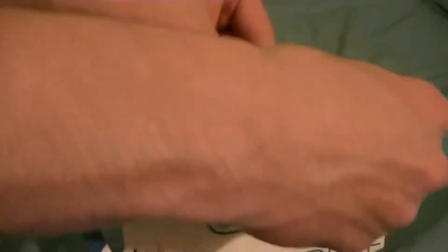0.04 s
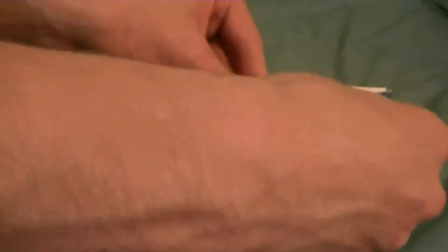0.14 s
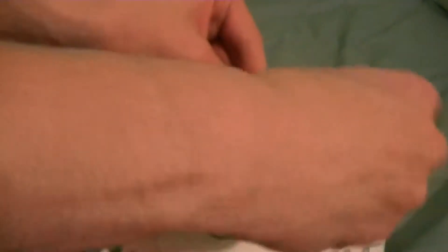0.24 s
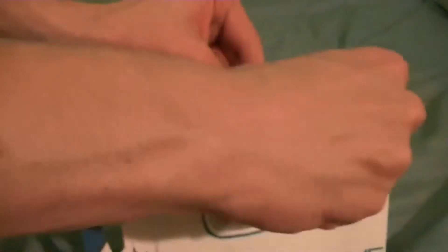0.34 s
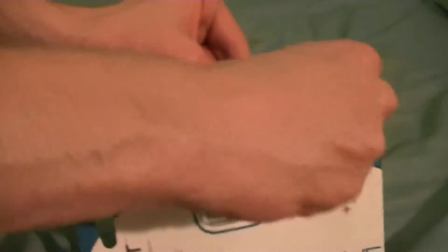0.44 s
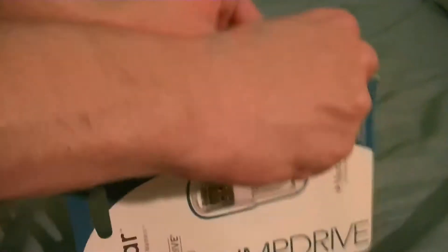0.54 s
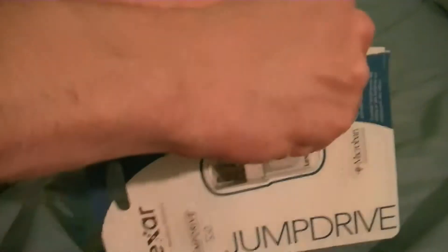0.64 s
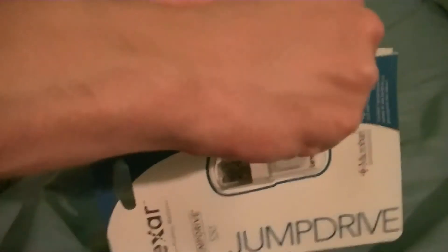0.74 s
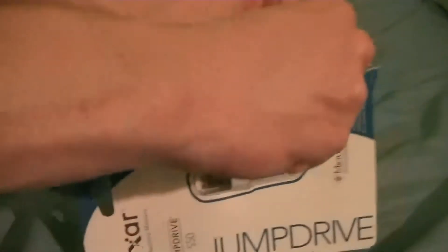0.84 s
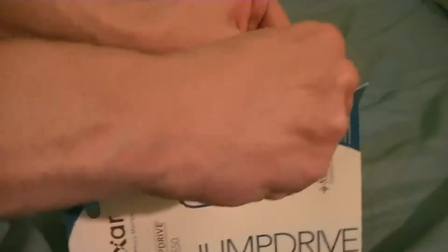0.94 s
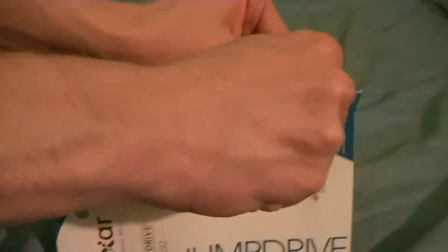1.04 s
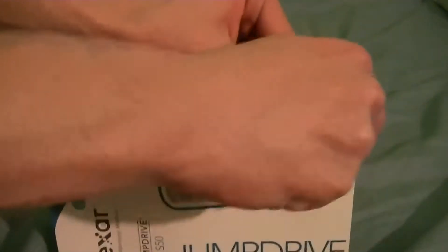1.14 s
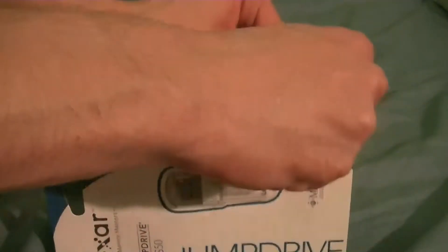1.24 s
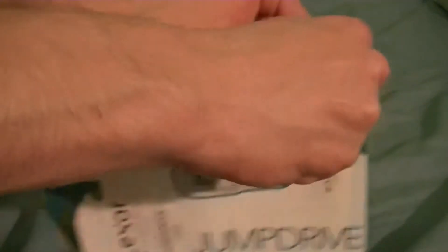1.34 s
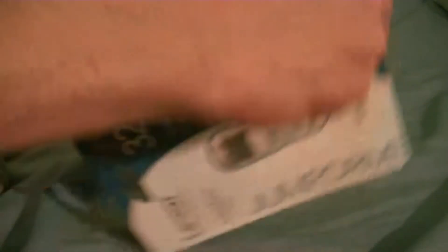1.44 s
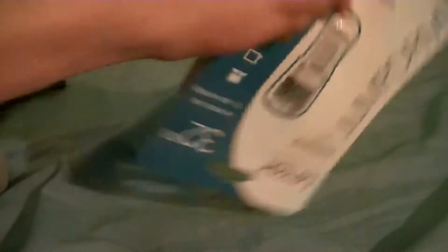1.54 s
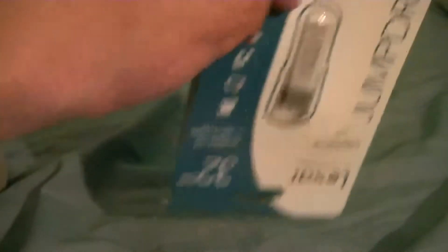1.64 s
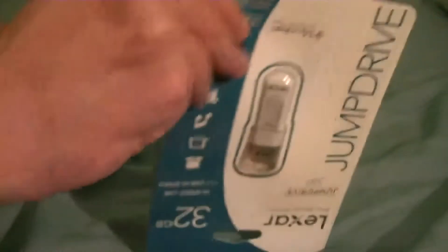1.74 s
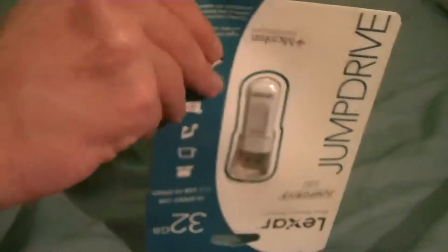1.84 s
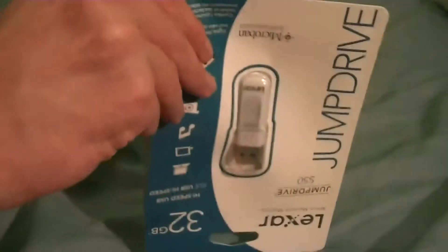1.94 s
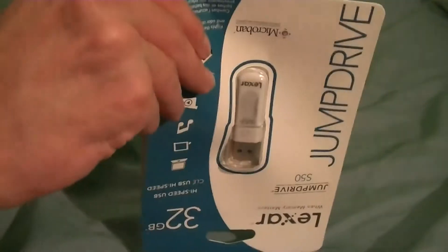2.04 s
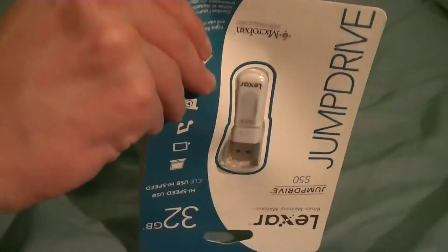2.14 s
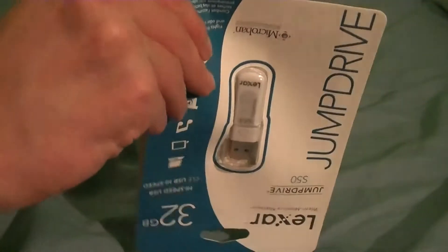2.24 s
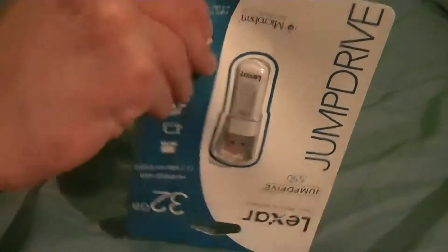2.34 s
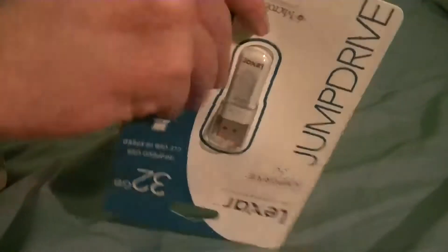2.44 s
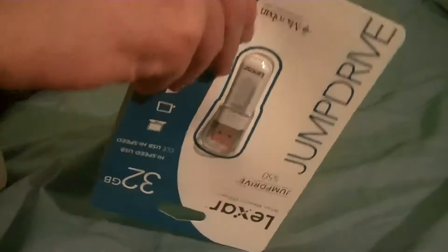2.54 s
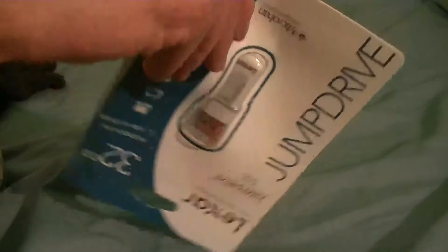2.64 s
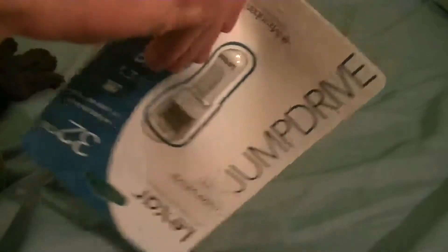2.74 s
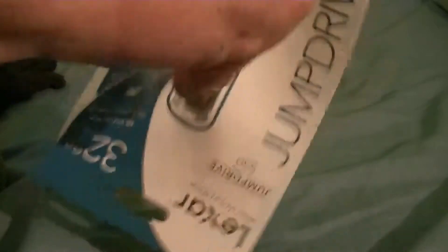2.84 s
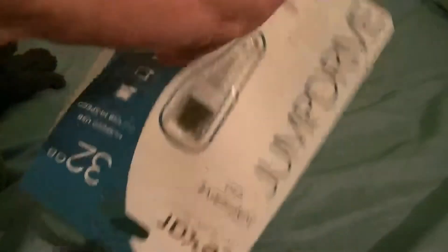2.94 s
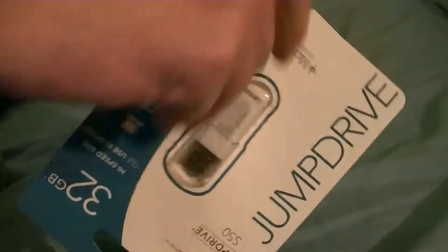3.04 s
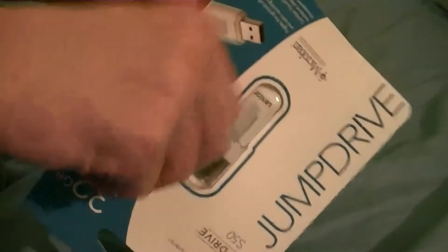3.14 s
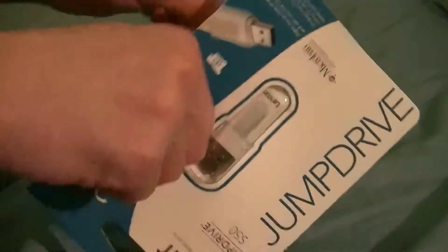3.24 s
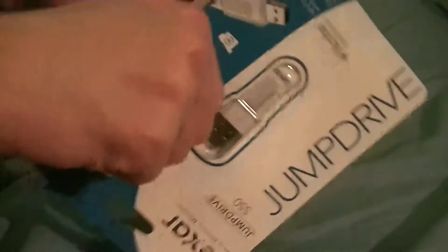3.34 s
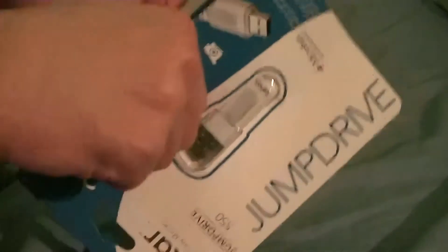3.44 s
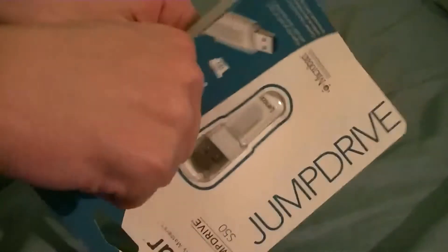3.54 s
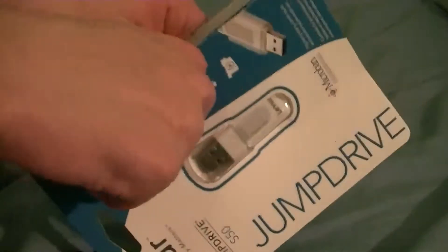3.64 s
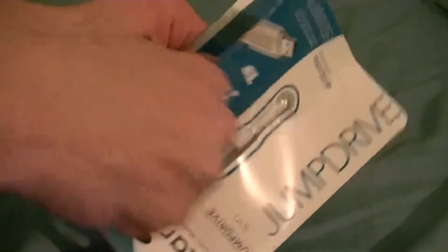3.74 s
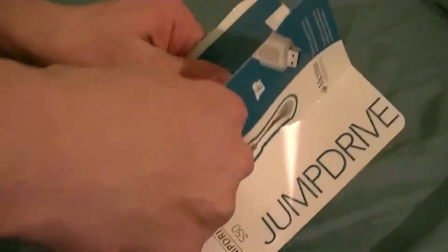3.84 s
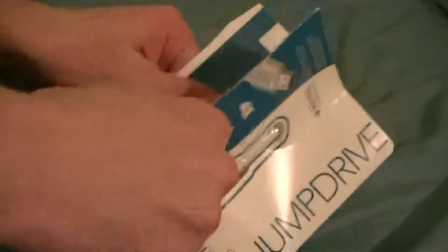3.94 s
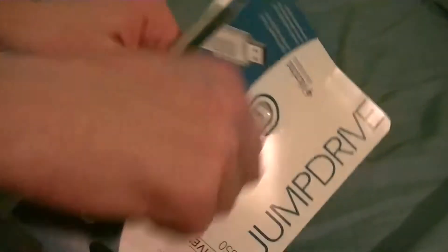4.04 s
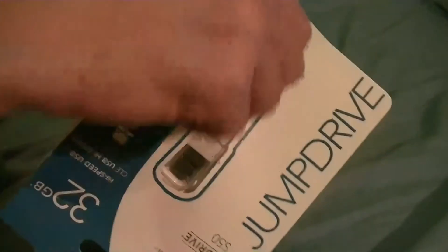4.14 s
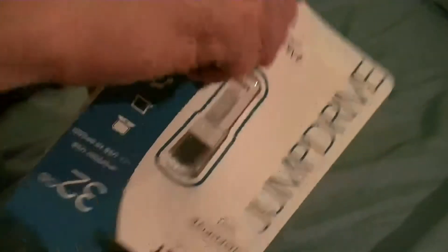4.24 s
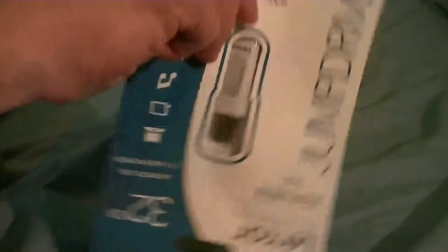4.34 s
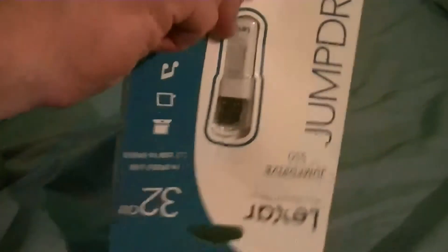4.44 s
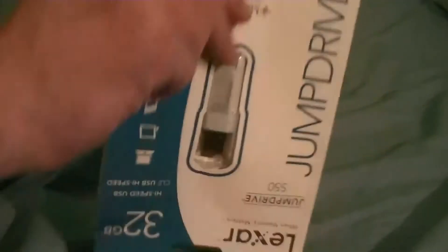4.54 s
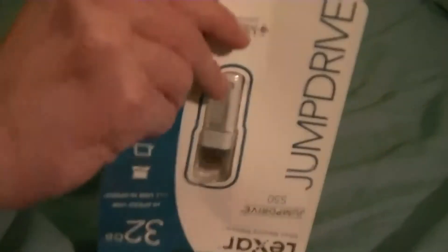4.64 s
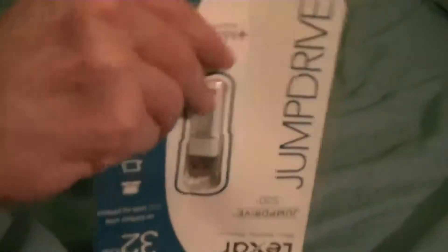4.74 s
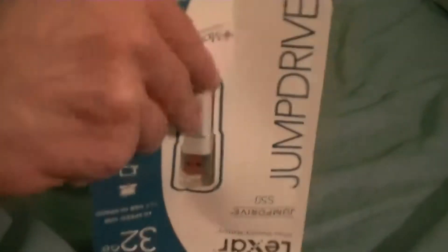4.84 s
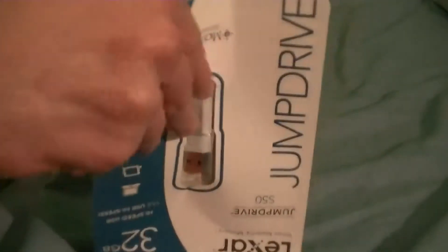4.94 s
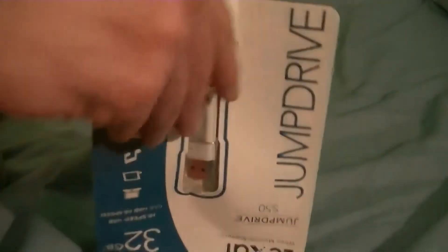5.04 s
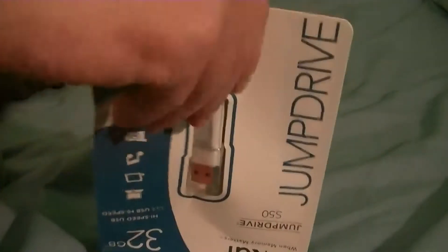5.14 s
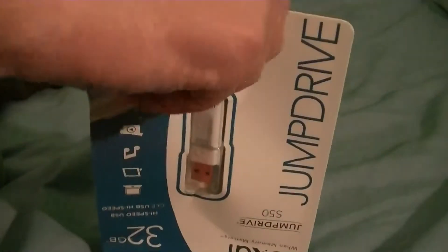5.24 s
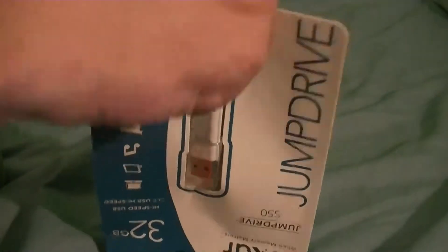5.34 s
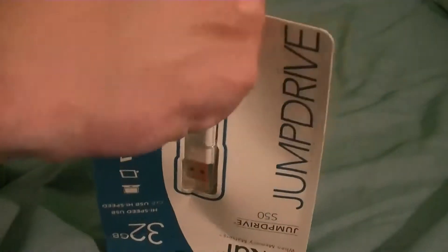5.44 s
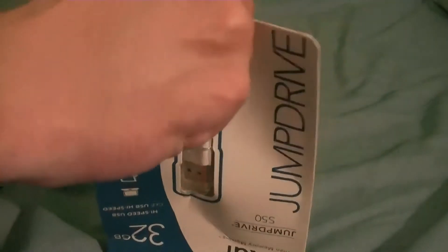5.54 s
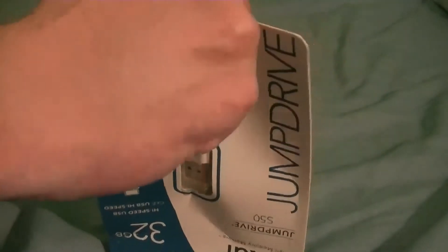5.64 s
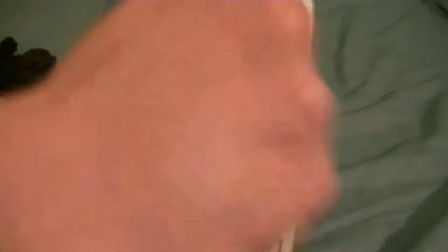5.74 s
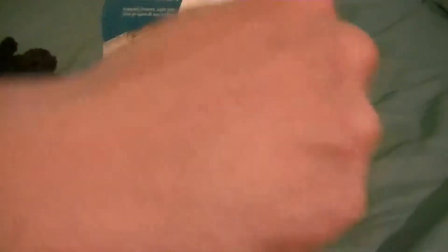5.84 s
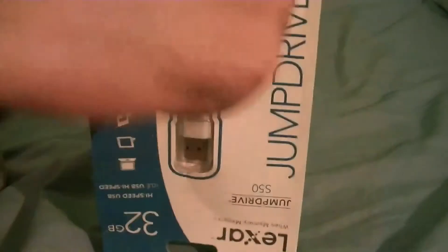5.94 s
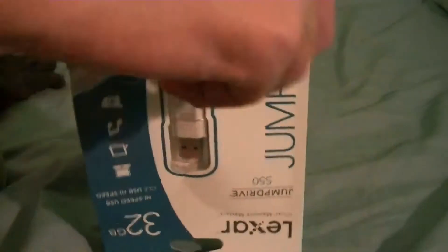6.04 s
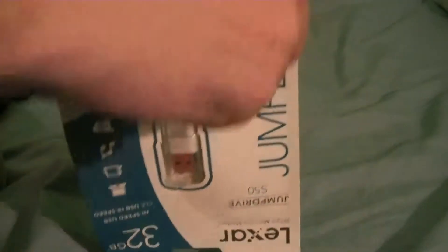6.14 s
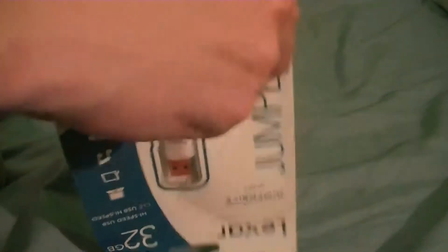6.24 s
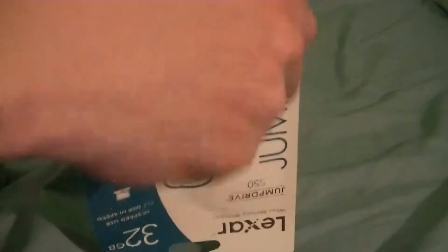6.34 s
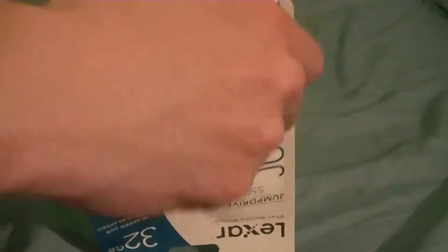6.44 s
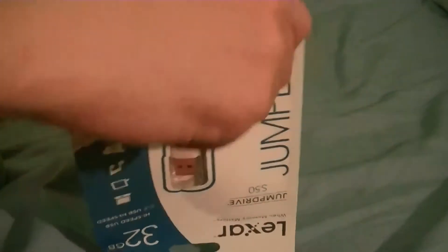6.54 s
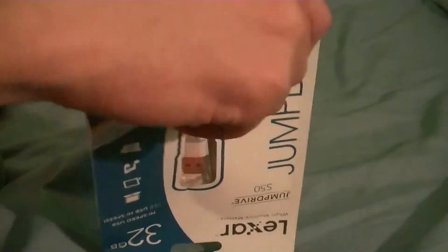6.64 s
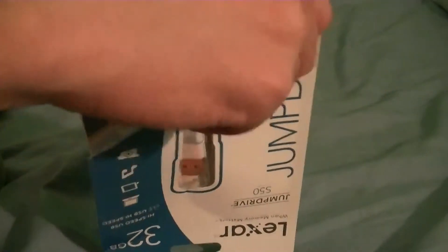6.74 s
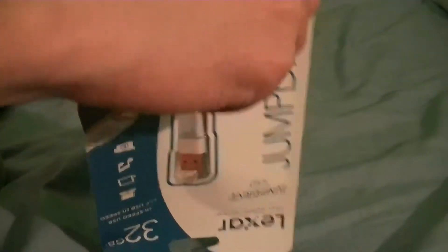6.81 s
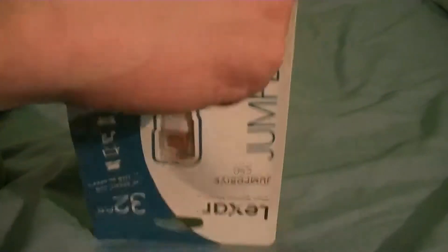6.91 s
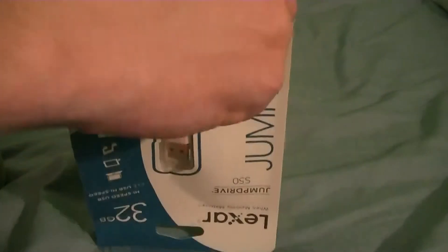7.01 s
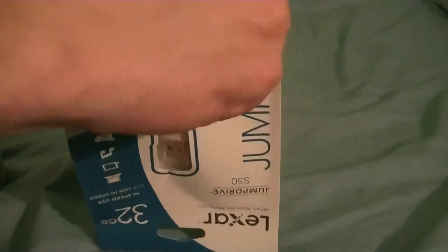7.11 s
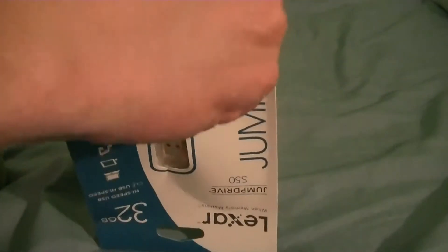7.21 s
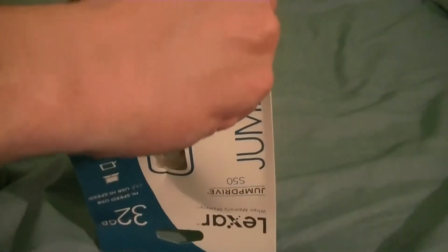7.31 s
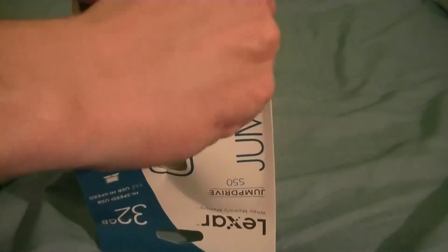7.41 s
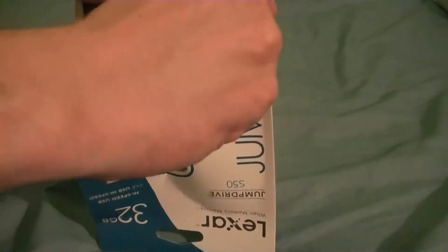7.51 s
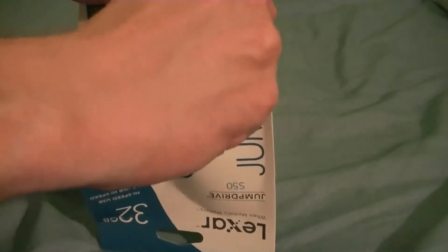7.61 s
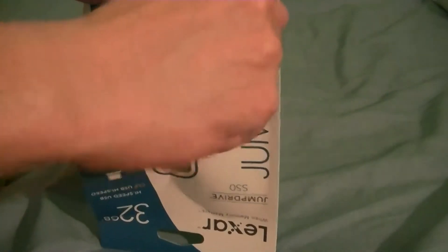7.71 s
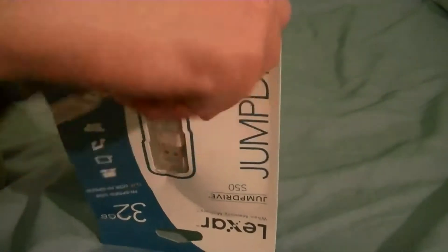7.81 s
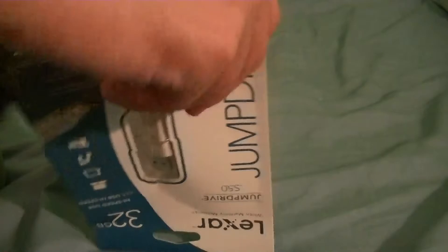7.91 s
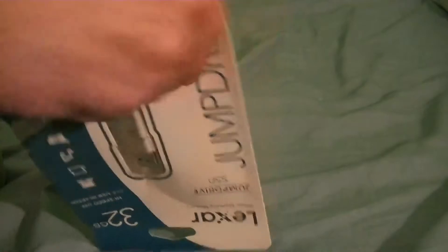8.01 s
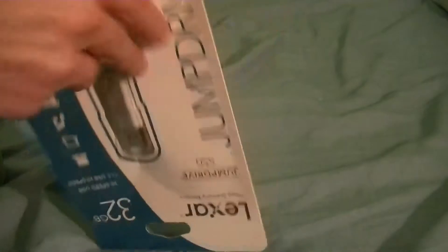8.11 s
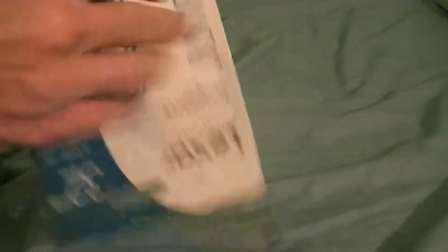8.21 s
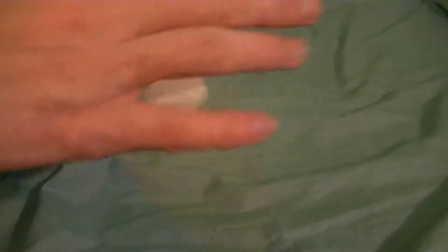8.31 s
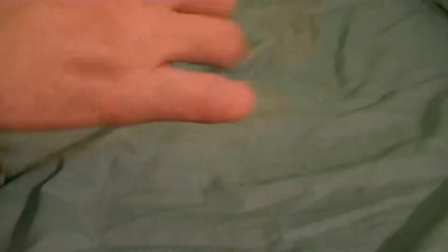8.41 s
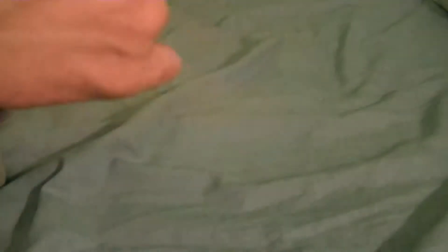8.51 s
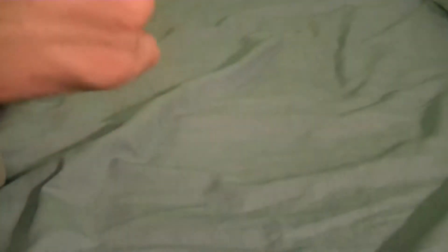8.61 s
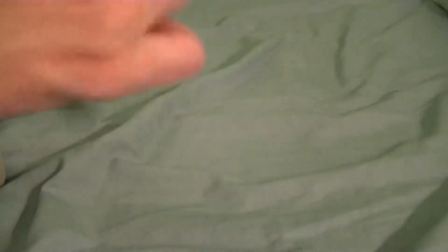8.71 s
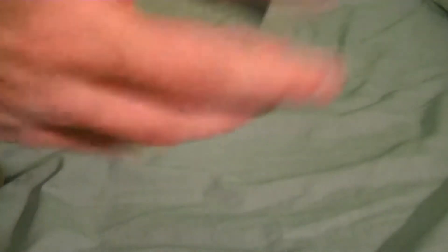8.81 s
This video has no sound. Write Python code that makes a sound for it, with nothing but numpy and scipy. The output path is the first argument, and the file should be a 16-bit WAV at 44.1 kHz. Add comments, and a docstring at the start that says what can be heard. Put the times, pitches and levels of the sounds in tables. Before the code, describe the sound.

Close, dry handling of a card-and-plastic blister pack over a bed in a small furnished room, heard through a small camera microphone with faint steady hiss. It opens with a short card-on-skin rub, then soft strokes, fine crinkling and isolated cracks until 1.5 s, with tiny skin squeaks and light scraping. Soft knocks near 1.5 s lead to quieter, dense ticking around 1.9-2.3 s. At 2.75 s the seam rips in a sharp, loud burst. Rubbing resumes; hard plastic cracks cluster at 3.7 s and 4.4 s, with a quick high squeak sliding down at 4.5 s. After lighter clicks, the loudest ripping fracture overloads at 5.6-5.75 s. Crisp pops and rubs follow, strongest near 6.9 s, thinning past 7 s. Around 8.1-8.25 s the pack is lifted with squeak, snap and brief ringing, then faint rustling and a last small crack at 8.6 s.

```python
"""First a short dry rub of card on skin, then hands prying open a card-and-plastic blister pack.
Place: over a bed in a small furnished room; distance: close; microphone: that of a small camera.
Rubs and rips are tiny fibre clicks and noise through the pack's resonances; the shell's cracks are ringing
pulses, skin squeaks in stick-slip partials, and an edge scrapes as slips driving a sliding resonance.
Twice the seam snaps in runs of fractures that overload the microphone; the room answers briefly."""
import sys
import numpy as np
from scipy import signal
from scipy.fft import rfft, irfft, next_fast_len
from scipy.io import wavfile
from scipy.ndimage import map_coordinates

SR = 44100
rng = np.random.default_rng(int(sys.argv[2]) if len(sys.argv) > 2 else 0)


def file_out(sig):
    """Save sig as 16-bit WAV at sys.argv[1]."""
    # one column per channel
    cols = np.atleast_2d(sig).T
    # limit, then scale
    lim = np.clip(cols, -1, 1)
    pcm = np.round(lim * 32767).astype(np.int16)
    wavfile.write(sys.argv[1], SR, pcm)


N = 391166
T = np.arange(N) / SR  # time in seconds
TAPS = 2048  # length of a pulse in samples
HZ = np.fft.rfftfreq(TAPS, 1 / SR)

# Colour of card sliding on card and skin. Each row: frequency in Hz, relative level in dB.
RUB_COLOUR = [(30, -32.5), (60, -40), (120, -35.5), (200, -11.5), (400, -1.5), (700, 1), (1600, 2.5),
              (2500, -0.5), (4900, -1), (6300, -4), (7600, -8), (9600, -9.5), (12000, -17), (14200, -24.5),
              (16000, -29.5)]
# Broad resonances and dips of card and shell. Each row: centre in Hz, width in Hz, boost or cut in dB.
PACK_RESONANCES = [(716, 107, 0), (1468, 123, -1.5), (1877, 45, -1.5), (2380, 640, 1.5), (3320, 380, 1),
                   (4520, 300, 1.5), (6300, 1680, -8.5), (8300, 900, 1), (10400, 980, 0)]
# Fingers and card slide over each other. Each row: fastest moment in seconds, rise in seconds,
# fall in seconds, level in dB, extra card body in dB, extra hiss in dB.
STROKES = [(0.063, 0.015, 0.011, -46.5, -7, -3), (0.212, 0.019, 0.035, -53, 1, 4),
           (0.398, .1, 0.058, -55, 0.5, 2.5), (0.501, 0.043, 0.075, -52, 5, 4),
           (0.736, 0.018, 0.014, -52, 2.5, 1), (0.812, 0.011, 0.022, -58.5, 15.5, 0),
           (0.917, 0.12, 0.024, -54.5, -2.5, 4), (1.026, 0.07, 0.034, -54, -6, 4.5),
           (1.095, 0.016, 0.012, -48, 5, 1), (1.324, 0.098, 0.11, -50.5, 3, 4),
           (1.401, .047, 0.061, -48, -2.5, 7.5), (1.745, 0.12, 0.011, -64, 6, 7),
           (2.205, 0.017, 0.044, -61.5, 6, 5), (2.32, 0.021, 0.047, -58, 6, 9),
           (2.435, 0.051, 0.0043, -54.5, 8, 8.5), (2.664, 0.076, 0.024, -48.5, -3.5, 0),
           (2.915, 0.0089, 0.011, -47, -6, 10), (2.985, 0.024, 0.05, -52, 2.5, 7),
           (3.095, 0.07, 0.019, -55.5, -0.5, 7), (3.15, 0.0072, 0.059, -61, -14, 18.5),
           (3.253, .026, 0.043, -46.5, 2.5, -6.5), (3.408, 0.032, 0.028, -54, -4.5, 2.5),
           (3.507, 0.03, 0.046, -58, -28, 12), (3.681, 0.009, 0.026, -42, 5.5, -5),
           (3.944, 0.022, 0.014, -54, -16, 7.5), (4.015, 0.022, 0.049, -50, -1, 6),
           (4.07, 0.066, 0.069, -49, -11, 4.5), (4.259, 0.13, 0.027, -58, 5.5, 5.5),
           (4.345, 0.021, 0.16, -53, -1.5, 3), (4.51, 0.0032, 0.022, -39, -15, -4),
           (4.752, 0.055, 0.031, -53, -15, 13.5), (4.885, 0.0098, 0.097, -66, 7, 13.5),
           (5.056, 0.094, 0.01, -52.5, -12, 5), (5.172, 0.015, 0.02, -59.5, -11, 5.5),
           (6.168, 0.024, 0.0091, -49.5, 0.5, 0), (6.22, .016, 0.05, -44.5, -0.5, 1),
           (6.395, 0.0074, 0.034, -57, -12, 6), (6.624, 0.072, 0.017, -51.5, 2.5, 2.5),
           (6.781, .026, 0.15, -46.5, -2, 2), (6.865, 0.0083, 0.023, -39, 8.5, -13),
           (7.06, 0.032, 0.087, -57.5, -2.5, 2.5), (7.294, 0.0031, 0.029, -57, 5.5, 6),
           (7.505, 0.023, 0.024, -63.5, 0, -1), (7.732, 0.025, 0.029, -58.5, -2, 8),
           (7.992, 0.039, 0.056, -52, -1.5, 7.5), (8.112, 0.029, 0.023, -44.5, -7, 1),
           (8.199, 0.0026, 0.0091, -42.5, 6.5, 0), (8.227, 0.0037, 0.033, -48, 7, -4),
           (8.498, 0.11, 0.02, -56, -5, 0.5), (8.647, 0.012, .048, -53, 1, 0.5)]
# Light rubbing of the hands that hold the pack. Each row: time in seconds, level in dB.
HOLDING = [(0.0, -66), (1.5, -61.5), (1.9, -73.5), (2.3, -61.5), (3.1, -61.5), (3.62, -70), (3.88, -72.5),
           (4.6, -61), (5.2, -64), (5.36, -68.5), (5.5, -69), (5.98, -72.5), (6.75, -63), (7.0, -87),
           (7.26, -76), (7.9, -63.5), (8.33, -92), (8.45, -76), (8.8, -81)]
# The card rips. Each row: start in seconds, rise in seconds, level in dB, fade in dB per second,
# extra card body in dB, extra hiss in dB.
RIPS = [(2.73, 0.073, -36, 148, -2.5, 4.5), (3.678, 0.05, -46.5, 245, 11, 4.5),
        (5.632, 0.057, -31, 148, 4.5, -1.5)]
# The shell buckles. Each row: start in seconds, peak in dB before the common trim in cracking(),
# ring in Hz, tick in dB, thump in dB.
CRACKS = [(0.243, -24, 1740, -8.5, -24), (0.688, -33.5, 2310, -4, -26), (0.815, -32, 1610, 0, 14),
          (1.094, -36.5, 2320, -14, 12), (1.642, -43, 1430, 7, -8), (1.874, -39.5, 1400, -6, -7),
          (1.919, -46.5, 770, 3, 6), (1.962, -30, 835, 2.5, -12), (1.986, -44, 1700, -12, -8),
          (2.033, -38.5, 1470, -1, 5), (2.0815, -36, 3140, 18, 5), (2.0843, -34, 1560, -6, 6),
          (2.116, -44, 640, -21, 3), (2.149, -56, 1700, -13, -6), (2.162, -36, 1480, -15, -40),
          (2.185, -39, 1450, -18, -18), (2.213, -38, 1470, -6, 3), (2.227, -40, 1560, 14, -5),
          (2.247, -39, 1750, -9, -8), (2.294, -39.5, 1250, 2, -2), (3.035, -33, 2350, -5, -15),
          (3.343, -39, 5500, 17, -10), (3.677, -25, 1320, -21, -1), (3.697, -21.5, 1280, -5, -11),
          (3.712, -16.5, 2000, -24, -36), (3.737, -11.5, 2060, 4, 1), (3.893, -39.5, 1540, -24, 3),
          (4.021, -28, 1900, -5, 1), (4.352, -18.5, 1900, -10, -13), (4.384, -21.5, 2160, -5, -14),
          (4.416, -38, 2440, -8, 3), (5.13, -30.5, 2660, 7, 6), (5.223, -45, 2140, -10, -6),
          (5.238, -32.5, 2040, -5, 4), (5.38, -44, 1240, 2.5, 0.5), (5.456, -38.5, 1960, 4, 2),
          (5.477, -41, 1380, 0, -4), (5.572, -31.5, 1620, -5, -24), (5.671, -14.5, 1840, -10, -4),
          (5.673, -11, 1220, -4, -12), (5.71, -7, 1770, -48, 2), (5.713, -15.5, 2150, -10, -6),
          (5.726, -16.5, 1650, -21, -8), (5.741, -20, 1780, -17, 7), (6.061, -34.5, 2930, 7.5, 3),
          (6.139, -24, 3130, -5, -5), (6.483, -33, 3020, -1, 2), (6.576, -29.5, 2280, -4, -27),
          (6.722, -36.5, 1290, -6, 5), (6.775, -28, 1120, 2, -1), (6.865, -17.5, 1170, -6, -5),
          (6.877, -18.5, 1890, -9, -26), (7.13, -29, 1330, -2.5, -2), (7.291, -30.5, 1460, -19, 1),
          (7.864, -27.5, 1920, 2, 4), (7.887, -36, 1070, -9, -10), (7.933, -31, 1800, -8, 10),
          (7.949, -38, 2000, -5, 0), (7.995, -26.5, 1920, -3, -20), (8.198, -25.5, 2460, 5, 13),
          (8.2266, -26, 1640, 9, 11), (8.259, -32, 1960, -13, -4), (8.638, -33, 2130, -9, 11)]
# Colour of a fracture. Each row: frequency in Hz, relative level in dB.
CRACK_COLOUR = [(30, -35.5), (150, -16.5), (400, -4.5), (1000, -1.5), (2000, 1.5), (3300, 2), (5000, -3.5),
                (8000, -3.5), (12000, -14.5), (16000, -45.5)]
# Modes of a buckling facet. Each row: ratio to its ring, level in dB.
FACET_MODES = [(1, 14), (0.59, 11), (1.4, 4.5), (6, 0)]
# The seam gives way in runs of fractures. Each row: start in seconds, peak of the first fracture in dB,
# length in seconds, thump in dB, ring width in Hz (its sign has no effect).
SNAPS = [(2.728, -13.5, 0.0024, 8.5, 3), (2.7509, -12.5, 0.0012, 9.5, -2),
         (2.7703, -16.5, 0.0021, -15, 3.5), (5.6308, -13, 0.0037, 7, 11), (5.7005, -15, .0045, 3.5, -3)]
# Spells of fine crinkling. Each row: start in seconds, end in seconds, middle of the peak levels in dB.
CRINKLES = [(0.095, 1.502, -46.5), (1.798, 2.269, -53), (3.675, 3.798, -42), (5.668, 5.79, -26.5),
            (6.449, 6.953, -41), (8.354, 8.711, -52)]
# Skin sticks and slips on plastic. Each row: start in seconds, length in seconds, start pitch in Hz,
# middle pitch in Hz, end pitch in Hz, level in dB, second partial in dB, third partial in dB,
# pitch jitter as a share.
SQUEAKS = [(0.53, 0.117, 584, 635, 673, -52, -6, 0, 0.0037),
           (0.59, 0.04, 590, 784, 560, -46.5, -3, -7, 0.017),
           (0.792, 0.036, 1080, 1277, 1720, -49.5, -14, -18, 0.1),
           (1.328, 0.054, 591, 776, 590, -51, -8, -11, .02),
           (1.403, 0.023, 930, 768, 480, -48, -12, -16, .04),
           (2.301, 0.046, 420, 469, 337, -55.5, -4, -8, 0.023),
           (2.394, 0.048, 573, 960, 580, -46, -17, -27, 0.033),
           (3.243, 0.026, 1150, 1288, 1180, -37, -10, -32, 0.023),
           (4.217, 0.05, 416, 625, 430, -53, -10, -21, 0.017),
           (4.506, 0.012, 2040, 2020, 1840, -30, -12, -31, .008),
           (4.516, 0.00717, 1840, 1470, 1000, -26.5, -10.5, -21, 0.0092),
           (4.518, 0.023, 1092, 589, 420, -43, 2, -10.5, 0.069),
           (6.225, 0.013, 1300, 1670, 1420, -36, -34, -28, .01),
           (8.104, 0.022, 1110, 1212, 1340, -37.5, -16, -17, 0.023),
           (8.109, 0.015, 1670, 1785, 1960, -37, -14, -16, .02)]
# An edge drags over the pack. Each row: start in seconds, length in seconds, start pitch in Hz,
# end pitch in Hz, width in Hz, level in dB.
SCRAPES = [(1.188, 0.16, 850, 1290, 302, -56.5), (1.287, 0.093, 2200, 2710, 170, -54.5),
           (1.392, 0.056, 1780, 2180, 300, -53), (1.458, 0.15, 1700, 2670, 260, -80),
           (1.572, 0.29, 1330, 1480, 200, -68.5), (2.322, 0.13, 2420, 2300, 170, -65),
           (2.413, 0.038, 960, 945, 50, -53), (2.78, 0.073, 3370, 3370, 800, -42.5),
           (3.239, 0.071, 1300, 940, 700, -43), (3.677, 0.027, 3200, 3230, 600, -39),
           (3.716, 0.061, 1340, 1350, 1110, -37.5), (4.205, 0.089, 3150, 3440, 350, -59),
           (4.939, 0.17, 2200, 2400, 550, -57), (5.285, 0.035, 2900, 2850, 1200, -54),
           (6.6, 0.029, 1060, 1050, 600, -49)]
# Fingertips knock on the card. Each row: start in seconds, peak in dB, ring in Hz.
KNOCKS = [(1.482, -46.5, 450), (1.531, -45, 590), (1.613, -52, 280), (5.058, -41, 615), (5.896, -42, 930)]
# The pack rings freely off the bedding. Each row: frequency in Hz, 60 dB decay in seconds, relative dB.
FREE_MODES = [(860, 0.14, -5), (1220, 0.1, -5), (1820, 0.063, -3), (2433, 0.11, -2), (3050, 0.062, 2)]
# Echoes off hands and camera. Each row: delay in seconds, level in dB.
NEAR_ECHOES = [(.0021, -25), (.0034, -39), (.0058, -33.5)]
# Decay of the room. Each row: frequency in Hz, 60 dB decay in seconds.
ROOM_DECAY = [(250, 0.049), (700, 0.19), (1800, 0.24), (4600, 0.21), (12000, 0.5)]
# Reverberation that differs between the ears. Each row: frequency in Hz, level in dB.
ROOM_WIDTH = [(60, -9), (250, -12.5), (1000, -42.5), (3500, -18.5), (12000, -34)]
# Colour of room and microphone noise. Each row: frequency in Hz, relative level in dB.
HUSH_COLOUR = [(15, -62.5), (25, -24.5), (120, -12.5), (575, 10), (2000, 0), (4740, -10), (6210, -3.5),
               (9840, -24.5), (14400, -14.5), (16000, -45)]


def rubbing(grains_per_s=2200, spread_db=3.0, smooth=0.95, judder_db=3.0, travel_s=0.001796,
            body_hz=1000, hiss_hz=5800):
    """Fibres catch and let go in tiny clicks over a smooth slide; the grip judders."""
    size = next_fast_len(N)
    caught = rng.random(size) < grains_per_s / SR
    catches = caught * amp(spread_db * np.minimum(rng.exponential(1, size), 4))
    drive = unit(catches * rng.choice([-1, 1], size)) + smooth * rng.standard_normal(size)
    card = disperse(pulse(read(RUB_COLOUR, HZ) + pack_db()), travel_s)
    slide = flexing(signal.oaconvolve(drive, card)[:size])
    body = band(slide, 0, body_hz)[:N]
    middle = band(slide, body_hz, hiss_hz)[:N]
    hiss = band(slide, hiss_hz, SR)[:N]
    shaped = (np.sqrt(effort()) * [body, middle, hiss]).sum(0) / middle.std()
    return amp(judder_db * wander(T, 220)) * shaped


def effort(holding_body_db=-1.5, holding_hiss_db=3, roundness=1.68, rip_onset_db=-19.5,
           rip_dulls_db_per_s=59):
    """Power of body, middle and hiss: the holding hands, each stroke and each rip add up."""
    def bands(db, body_db, hiss_db):
        """Power in the three bands."""
        return amp([db + body_db, db, db + hiss_db]) ** 2

    holding_db = np.interp(T, *np.transpose(HOLDING))
    power = bands(holding_db, holding_body_db, holding_hiss_db)
    for s, rise, fall, db, body_db, hiss_db in STROKES:
        near = abs(T - s) < .5
        t = T[near] - s
        # roundness 1 would be a pointed swell, 2 a bell
        swell = np.exp(-abs(t / np.where(t < 0, rise, fall)) ** roundness)
        power[:, near] += bands(db, body_db, hiss_db)[:, None] * swell ** 2
    for s, rise, db, fade, body_db, hiss_db in RIPS:
        near = (T >= s) & (T < s + 1)
        t = T[near] - s
        dying = np.maximum(t - rise, 0)
        rip_db = db + rip_onset_db * np.maximum(1 - t / rise, 0) - fade * dying
        # the hiss dies sooner than the rest
        power[:, near] += bands(rip_db, body_db, hiss_db - rip_dulls_db_per_s * dying)
    return power


def flexing(x, bend=0.17, shifts_per_s=14, panel_db=-1, grip_db=5, count=5):
    """Bending retunes the lowest resonances, and the fingers damp now one, now another."""
    t = np.arange(len(x)) / SR
    out = x.copy()
    for hz, width, _ in PACK_RESONANCES[:count]:
        free = amp(panel_db + grip_db * np.clip(wander(t, shifts_per_s), -2, 1))
        out += free * resonate(x, hz * np.exp(bend * wander(t, shifts_per_s)), width)
    return out


def off_the_hand(x, delay_s=0.0016, sway=0.221, moves_per_s=7, echo_db=-14):
    """The moving hand throws the rubbing back; the changing path makes its colour sweep."""
    delay = delay_s * np.exp(sway * wander(T, moves_per_s))
    echo = map_coordinates(x, [(T - delay) * SR], order=3)
    return (x + amp(echo_db) * echo) / np.sqrt(1 + amp(echo_db) ** 2)


def pack_db():
    """Spectrum in dB of the broad resonances of card and shell."""
    return sum(db / (1 + (2 * (HZ - hz) / width) ** 2) for hz, width, db in PACK_RESONANCES)


def shell(tick_db, thump_db, tick_hz=5500, thump_hz=700):
    """Spectrum in dB of one fracture: a sharp crease adds tick, a wide panel adds thump."""
    tick = tick_db * HZ ** 4 / (HZ ** 4 + tick_hz ** 4)
    thump = thump_db / (1 + (HZ / thump_hz) ** 2)
    return read(CRACK_COLOUR, HZ) + pack_db() + tick + thump


def crack(peak_db, ring_hz, tick_db, thump_db, width_hz=300, mistune=0.057, rustle_db=-23,
          rustle_s=0.0045, travel_s=0.000752):
    """A facet flips over, rings for a few cycles and shakes the sheet around it."""
    t = np.arange(TAPS) / SR
    ring_power = np.ones(len(HZ))
    for ratio, db in FACET_MODES:
        hz = ring_hz * ratio ** (1 + mistune * rng.standard_normal())
        ring_power += amp(db) ** 2 / (1 + (2 * (HZ - hz) / width_hz) ** 2)
    drive = amp(rustle_db) * rng.standard_normal(TAPS) * np.exp(-t / rustle_s)
    drive[0] = 1  # the flip itself, ahead of the rustle
    facet = pulse(shell(tick_db, thump_db) + 10 * np.log10(ring_power))
    sound = disperse(signal.fftconvolve(drive, facet), travel_s)
    return amp(peak_db) * sound / abs(sound).max()


def cracking(trim_db=-2):
    """The distinct cracks of the bending shell."""
    out = np.zeros(N)
    for s, peak_db, ring_hz, tick_db, thump_db in CRACKS:
        add(out, s, crack(peak_db + trim_db, ring_hz, tick_db, thump_db))
    return out


def snapping(fade_db=6, count=6):
    """Each snap is a run of fractures a fraction of a millisecond apart, weakening along the run."""
    out = np.zeros(N)
    for s, peak_db, length, thump_db, width_hz in SNAPS:
        for k, (jitter, pitch) in enumerate(rng.random((count, 2))):
            along = (k + jitter * (k > 0)) / count
            ring_hz = 1300 + 2200 * pitch
            fracture = crack(peak_db - fade_db * along, ring_hz, 0.0078, thump_db, width_hz)
            add(out, s + along * length, (-1) ** (k // 2) * fracture)  # polarity flips every second one
    return out


def crinkling(spread_db=4, low_hz=1000, high_hz=3000, tick_db=-4, thump_db=-4, count=11):
    """Small creases tick at random while the shell is being bent."""
    out = np.zeros(N)
    for start, end, peak_db in CRINKLES:
        for k, (when, size, pitch) in enumerate(rng.random((count, 3))):
            at = start + (end - start) * (k + when) / count
            crease_db = peak_db + spread_db * (2 * size - 1)
            ring_hz = low_hz + (high_hz - low_hz) * pitch
            add(out, at, crack(crease_db, ring_hz, tick_db, thump_db))
    return out


def squeaking(flutter_db=2, fall_db=6.0, count=5):
    """Stick-slip cycles whose rate rises and falls with the speed of the finger."""
    out = np.zeros(N)
    for s, length, start_hz, middle_hz, end_hz, db, second_db, third_db, jitter in SQUEAKS:
        t = np.arange(0, length, 1 / SR)
        curve = np.polyfit([0, .5, 1], [start_hz, middle_hz, end_hz], 2)
        hz = np.polyval(curve, t / length)
        phase = 2 * np.pi * np.cumsum(hz * (1 + jitter * wander(t, 705))) / SR
        # from the third partial on, each is fall_db weaker than the last
        partials_db = [0, second_db, *(third_db - fall_db * np.arange(count))]
        slips = sum(amp(level) * np.sin((k + 1) * phase) for k, level in enumerate(partials_db))
        swell = np.sin(np.pi * t / length)
        add(out, s, amp(db + flutter_db * wander(t, 270)) * unit(slips) * swell)
    return out


def scraping(slips_per_s=2500, low_hz=200):
    """Irregular slips of an edge drive one sliding resonance; the scrape carries no bass."""
    out = np.zeros(N)
    for s, length, start_hz, end_hz, width, db in SCRAPES:
        size = round(length * SR)
        slips = rng.standard_normal(size) * (rng.random(size) < slips_per_s / SR)
        hz = np.geomspace(start_hz, end_hz, size)
        ring = resonate(resonate(slips, hz, width), hz, width)
        add(out, s, amp(db) * unit(ring) * np.sin(np.linspace(0, np.pi, size)))
    return signal.sosfilt(signal.butter(3, low_hz, "high", fs=SR, output="sos"), out)


def knocking(tick_db=-16, thump_db=0, low_hz=150, soft_hz=1200):
    """A soft fingertip sets off the low modes of the card only."""
    out = np.zeros(N)
    pad = signal.butter(2, [low_hz, soft_hz], "band", fs=SR, output="sos")
    for s, peak_db, hz in KNOCKS:
        knock = signal.sosfilt(pad, crack(0, hz, tick_db, thump_db))
        add(out, s, amp(peak_db) * knock / abs(knock).max())
    return out


def lifting(lift_s=8.114, peak_db=-47, drag_s=0.017):
    """A finger drags off the edge of the lifted pack and sets it ringing; the modes outlast the drag."""
    t = T[:SR // 2] - .1
    drag = rng.standard_normal(len(t)) * np.exp(-(t / drag_s) ** 2)
    out = np.zeros(N)
    for hz, t60, db in FREE_MODES:
        ring = resonate(drag, hz, np.log(1000) / np.pi / t60)
        add(out, lift_s + t[0], amp(peak_db + db) * ring / abs(ring).max())
    return out


def near_echoes(direct):
    """The direct sound with its first echoes off hands and camera."""
    near = direct.copy()
    for delay, db in NEAR_ECHOES:
        add(near, delay, amp(db) * direct)
    return near


def room_tail():
    """Sparse reflections of random sign, each band dying at its own speed."""
    size = SR // 2
    reflected = (rng.random(size) < 4000 / SR) * (T[:size] > .004)
    taps = rng.choice([-1., 1.], size) * reflected
    hz, t, z = signal.stft(taps, SR, nperseg=256)
    decay = amp(-60 * t / read(ROOM_DECAY, hz)[:, None])
    tail = signal.istft(z * decay, SR, nperseg=256)[1]
    return tail / np.linalg.norm(tail)


def hushing(level_db):
    """Steady room and microphone noise: white noise given the hush's colour."""
    noise = signal.oaconvolve(rng.standard_normal(N), pulse(read(HUSH_COLOUR, HZ)))[:N]
    return amp(level_db) * unit(noise)


def amp(db):
    """Decibels to gain."""
    return 10 ** (np.asarray(db) / 20)


def unit(x):
    """Scales to rms 1."""
    return x / np.sqrt(np.mean(x ** 2) + 1e-20)


def read(points, hz):
    """Joins spectrum points on a log-frequency axis."""
    f, value = np.transpose(points)
    return np.interp(np.log(hz + 1), np.log(f), value)


def add(mix, s, sound):
    """Mixes a sound in at time s."""
    part = mix[max(round(s * SR), 0):][:len(sound)]
    part += sound[:len(part)]


def pulse(db):
    """The sharpest causal pulse that has this spectrum (minimum phase, by folding the cepstrum)."""
    log_gain = irfft(np.log(amp(db)))
    log_gain[1:TAPS // 2] *= 2
    log_gain[TAPS // 2 + 1:] = 0
    return irfft(np.exp(rfft(log_gain)))


def band(x, lo_hz, hi_hz):
    """One band of a sound, with soft edges."""
    hz = np.fft.rfftfreq(len(x), 1 / SR) + 1
    return irfft(rfft(x) / (1 + (lo_hz / hz) ** 5) / (1 + (hz / hi_hz) ** 5), len(x))


def wander(t, rate):
    """Smooth chance of about unit size, renewed rate times a second."""
    return np.interp(t * rate, np.arange(TAPS * 2), rng.standard_normal(TAPS * 2))


def resonate(x, hz, width):
    """A resonance of gain 1 that follows the curve hz: shift it to 0 Hz, smooth, shift back."""
    turn = np.exp(2j * np.pi * np.cumsum(hz * np.ones(len(x))) / SR)
    r = np.exp(-np.pi * width / SR)
    return 2 * (turn * signal.lfilter([1 - r], [1, -r], x / turn)).real


def disperse(x, delay_s):
    """Bending waves run faster at high pitch; delay_s is the travel time at 1 kHz."""
    khz = np.fft.rfftfreq(2 * len(x), 1 / SR) / 1000
    lag = 4 * np.pi * delay_s * 1000 * np.sqrt(khz)
    return irfft(rfft(x, 2 * len(x)) * np.exp(-1j * lag))[:len(x)]


def scene(room_db=-11, hush_db=-72, hush_side_db=-11, dull_hz=7000):
    """The pack sits straight ahead; only room and hush differ a little between the ears."""
    direct = off_the_hand(rubbing()) + cracking() + snapping() + crinkling()
    direct += squeaking() + scraping() + knocking() + lifting()
    # bedding soaks up the treble before it reaches the room
    soft = signal.lfilter(*signal.butter(1, dull_hz, fs=SR), direct)
    tail = signal.oaconvolve(soft, room_tail())[:N]
    other_tail = signal.oaconvolve(soft, room_tail())[:N]
    middle = near_echoes(direct) + amp(room_db) * tail + hushing(hush_db)
    side = signal.oaconvolve(other_tail, pulse(read(ROOM_WIDTH, HZ)))[:N]
    side += hushing(hush_db + hush_side_db)
    return np.array([middle + side, middle - side])


def record(dry, overload_db=-12.5, edge_hz=15900):
    """The microphone flattens the loudest peaks; then the band limit."""
    flattened = dry / (1 + (dry / amp(overload_db)) ** 4) ** .25
    low_pass = signal.firwin(255, edge_hz, window=("kaiser", 9), fs=SR)
    return signal.oaconvolve(flattened, low_pass[None], "same")


dry = scene()
out = record(dry)
file_out(out)
```